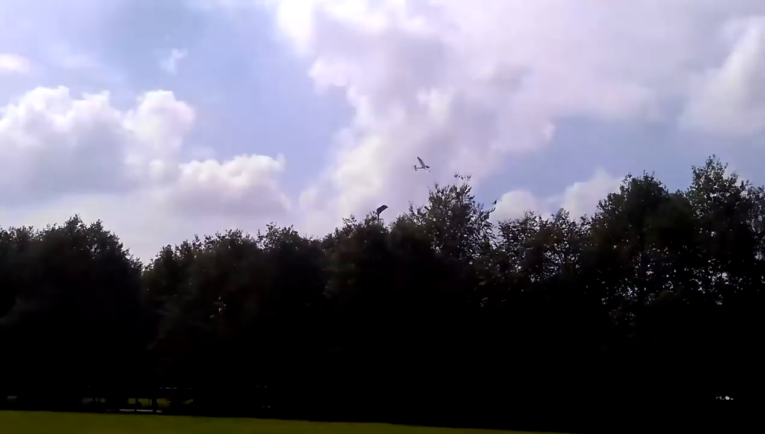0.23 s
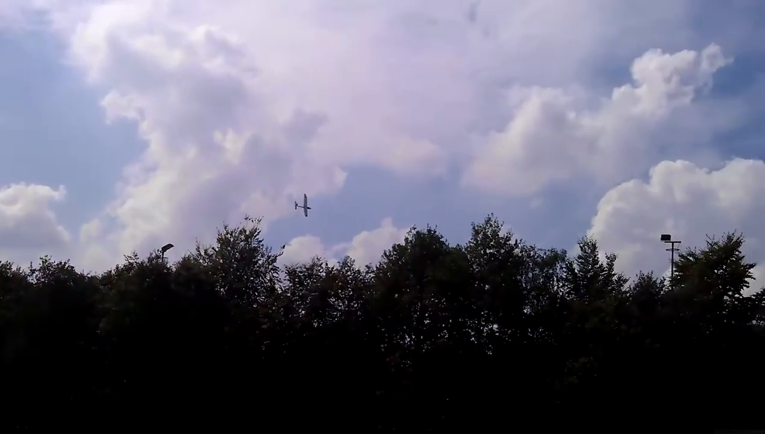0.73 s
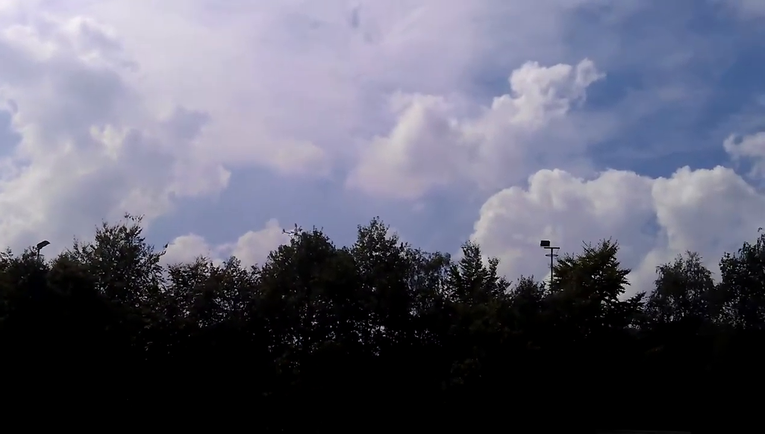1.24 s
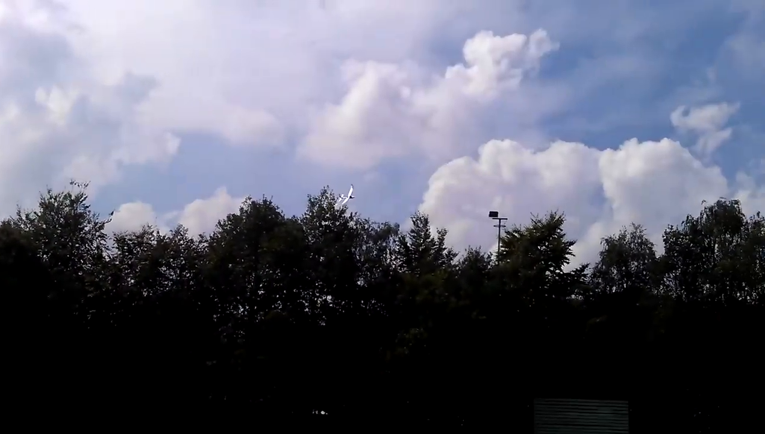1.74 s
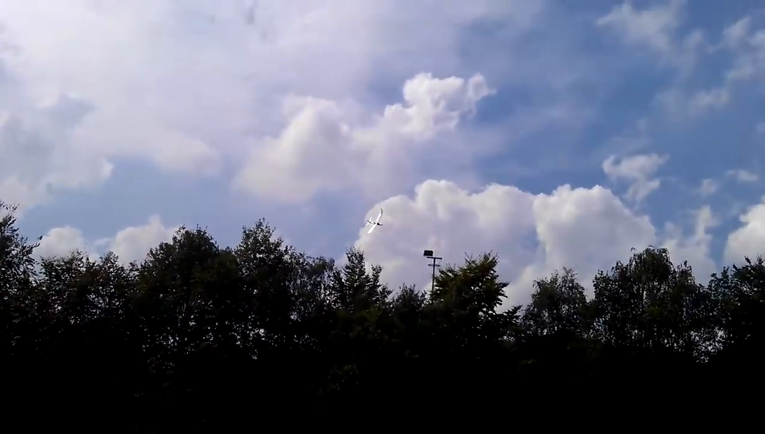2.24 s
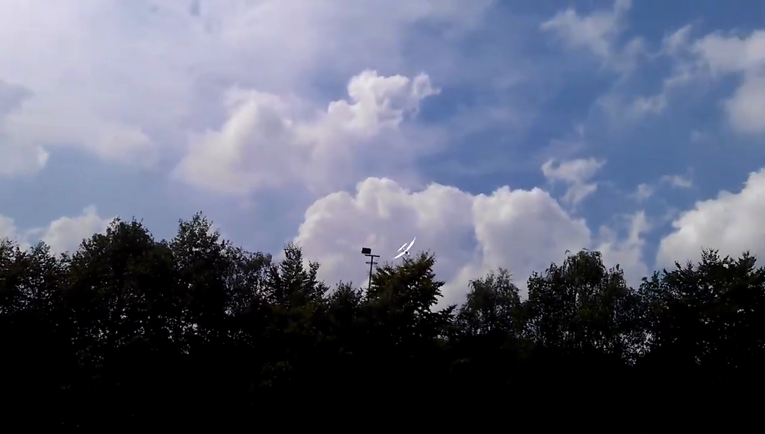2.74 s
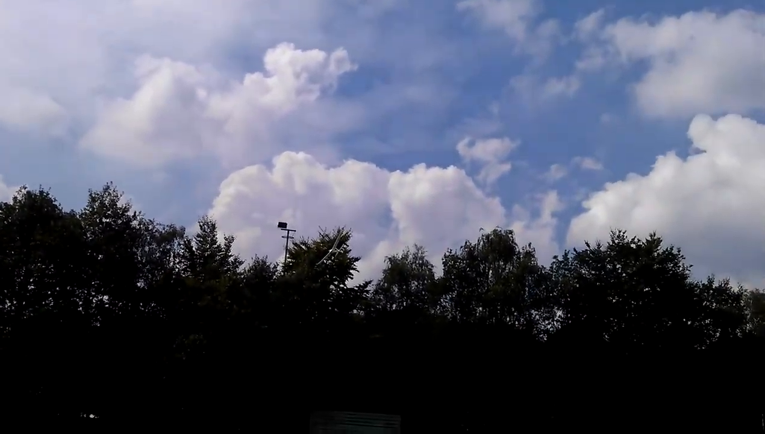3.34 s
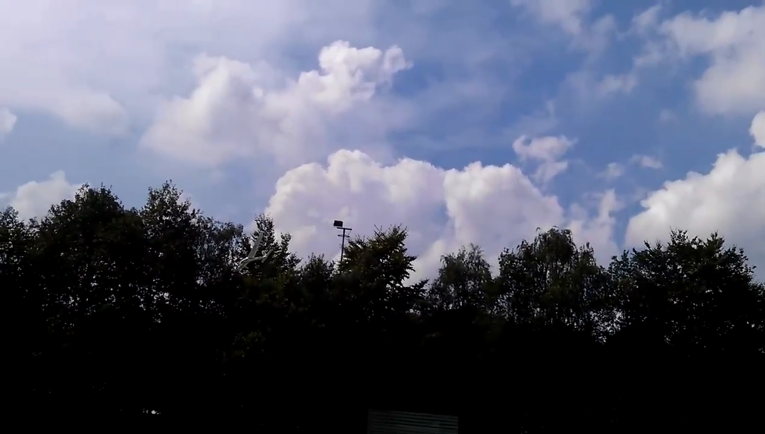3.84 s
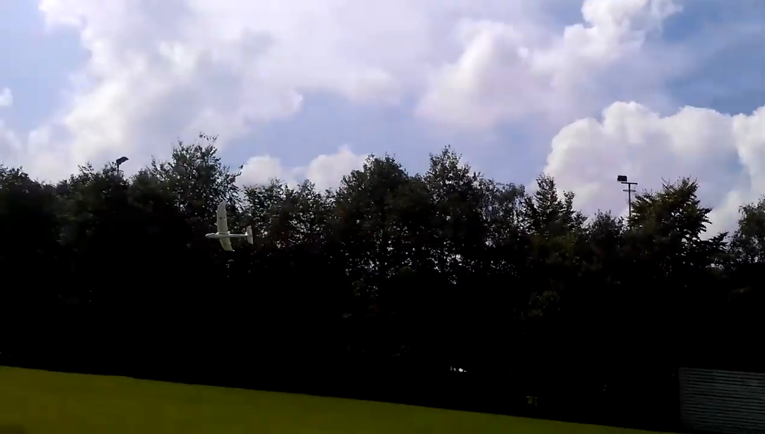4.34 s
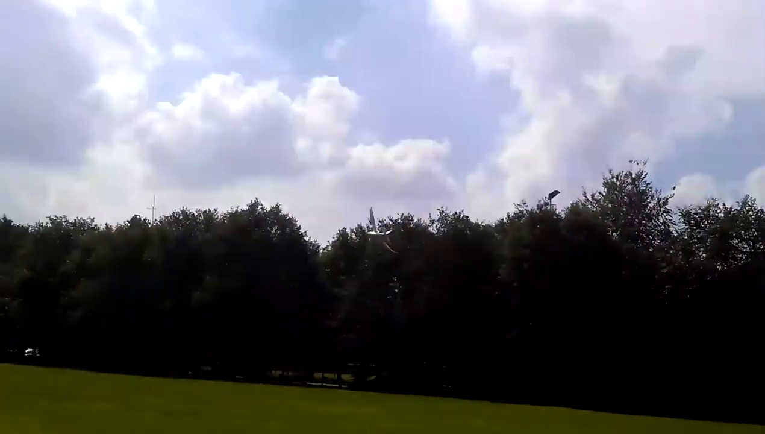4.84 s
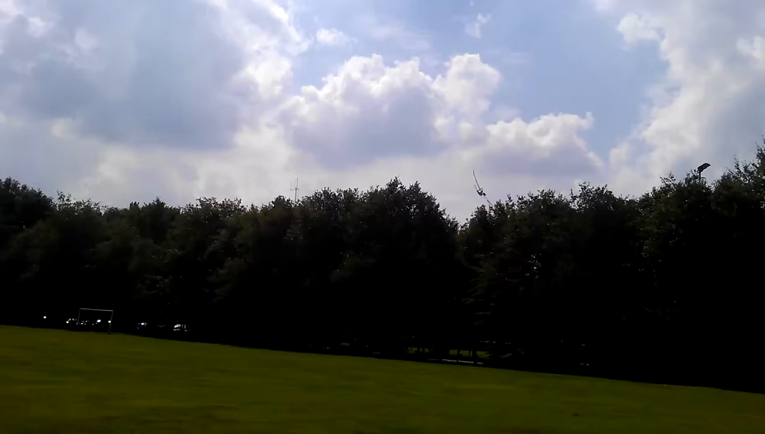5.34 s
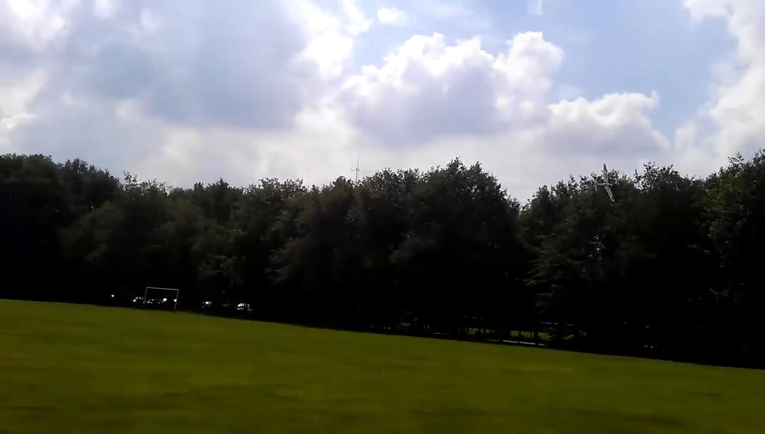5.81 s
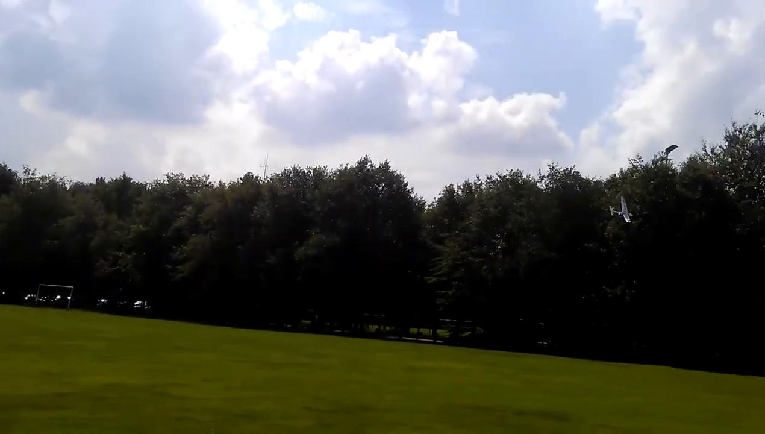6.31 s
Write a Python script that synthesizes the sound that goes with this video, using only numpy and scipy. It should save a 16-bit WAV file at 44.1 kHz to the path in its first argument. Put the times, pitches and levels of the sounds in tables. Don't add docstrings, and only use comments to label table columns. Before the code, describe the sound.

A small electric model plane whines shrilly past over an open field, swells close, then its motor cuts and winds down to quiet, with a sharp tick on the camera.

```python
import sys
import numpy as np
from scipy import signal
from scipy.fft import rfft, irfft
from scipy.io import wavfile
from scipy.ndimage import uniform_filter1d

SR = 44100
rng = np.random.default_rng(int(sys.argv[2]) if len(sys.argv) > 2 else 0)


def amplitude_ratio(level_db):
    exponent = np.asarray(level_db, float) / 20
    return 10 ** exponent


def put_to_file(sound):
    columns = np.atleast_2d(sound).T
    safe = np.clip(columns, -1, 1)
    whole_steps = np.round(safe * 32767)
    wavfile.write(sys.argv[1], SR, whole_steps.astype(np.int16))


N = 289869
TIME = np.arange(N) / SR
SIDES = np.array([[1], [-1]])

# [t/s, rate/(turns per s)]
POWERED = [(0.65, 223.2), (1.35, 223.3), (1.48, 227.0), (1.6, 228.1), (1.83, 231.8), (1.99, 233.0),
           (2.2, 231.8), (2.5, 233.2), (2.66, 236.3), (3.1, 238.5), (3.26, 237.4), (3.47, 240.7),
           (3.71, 239.2), (3.92, 240.7), (4.14, 239.0), (4.39, 232.2), (4.58, 227.5)]
# [t/s, rate/(turns per s)]
COASTING = [(4.58, 227.5), (4.7, 205.5), (4.78, 194), (4.86, 166), (4.95, 129), (5.08, 100), (5.42, 53.6),
            (5.63, 39.3), (5.91, 20.4)]
# [t/s, f/Hz]
CHOPPER_HZ = [(0.65, 7583), (1.33, 7643), (1.59, 7715), (1.87, 7821), (2.8, 7920), (3.25, 8002),
              (3.8, 7960), (4.1, 7890), (4.3, 7765), (4.7, 7494), (4.9, 7471)]
# [t/s, length/s, level/dB, left minus right/dB]
WHINE_GLINTS = [(0.668, 0.23, -39.5, -4), (1.009, 0.31, -44.5, -5), (1.277, 0.1, -42.5, -2),
                (1.414, 0.092, -32, -9.6), (1.546, 0.11, -29.0, -16.2), (1.744, 0.2, -33.5, -15),
                (1.89, 0.41, -40, -11), (2.304, 0.17, -33.5, -5.4), (2.442, 0.17, -33, -20),
                (2.666, 0.19, -35, -9.0), (2.894, 0.064, -35, -1), (3.051, 0.1, -53, -19.9),
                (3.329, 0.088, -51.5, -21.5), (3.49, 2.2, -52.5, -9), (3.886, 0.15, -29, -3.5),
                (4.032, 0.03, -33, -6.7), (4.131, 0.097, -28, -7), (4.279, 0.09, -24.5, -7),
                (4.46, 0.21, -28.5, -7.5), (4.613, 0.061, -31, -13.1)]
# [t/s, length/s, level/dB]
COAST_GLINTS = [(4.82, .12, -59), (4.92, .08, -59), (4.989, .034, -41.5), (5.04, .06, -53),
                (5.14, .08, -55), (5.22, .04, -61), (5.285, .04, -58), (5.41, .13, -55.5),
                (5.575, .08, -57), (5.76, .1, -60.5), (5.86, .07, -64)]
# [t/s, length/s, level/dB, left minus right/dB]
CHOPPER_GLINTS = [(.754, 0.15, -59, -22), (1.04, 2.1, -53, -4), (1.44, 0.082, -32.5, -12),
                  (1.58, 0.081, -34, -9), (1.74, 0.14, -38, -17), (2.03, 0.39, -50.5, -5),
                  (2.294, 0.16, -40.5, -9), (2.465, 0.18, -36.5, -17), (2.659, 0.081, -37, -20),
                  (2.868, 0.16, -36, -3), (3.072, 0.15, -42.5, -14), (3.283, 0.34, -42, -21.5),
                  (3.489, 0.14, -42.5, -20.5), (3.86, .534, -51, -8), (4.094, 0.18, -30, -20),
                  (4.272, .073, -30, -13), (4.43, 0.15, -32.5, -11.5), (4.55, 0.12, -39, -11.5),
                  (4.684, 0.14, -43, -13)]
# [t/s, length/s, level/dB]
BLADE_BEAMS = [(0.74, 0.93, -57), (1.682, 0.75, -45.5), (2.373, 0.41, -48.5), (2.84, 1, -54),
               (3.49, 0.14, -50.5), (3.889, 0.4, -44.8), (4.245, 0.47, -32.5), (4.651, 0.069, -41),
               (4.725, 0.17, -41.5)]
# [t/s, length/s, level/dB]
SECOND_BEAMS = [(0.841, 1.25, -56.5), (1.611, 0.42, -48.5), (3.04, 0.68, -57.5), (3.518, 0.396, -52.5),
                (3.934, 0.315, -41.5), (4.236, 0.37, -34), (4.618, 0.286, -47.5)]
# [t/s, length/s, level/dB]
HALF_BEAMS = [(.79, 1.2, -55), (1.351, .19, -57), (1.562, .09, -48), (1.812, .565, -45.5),
              (2.38, .4, -49.5), (2.76, .44, -49.5), (3.1, .34, -53), (3.46, .47, -46.5), (3.833, .35, -48),
              (4.073, .177, -39.5), (4.303, .045, -41), (4.4, .36, -41), (4.69, .1, -48)]
# [t/s, length/s, level/dB]
UPPER_BEAMS = [(.9, 0.67, -58), (2.3, 0.26, -58), (2.7, 0.28, -56), (3.5, .2, -62.5), (3.88, .2, -47),
               (4.1, .2, -47.5), (4.32, 0.07, -40), (4.48, 0.26, -35), (4.62, .08, -48)]
# [t/s, length/s, level/dB]
BEAT_BEAMS = [(.95, 0.86, -64), (1.45, 0.17, -55), (1.75, .2, -59.5), (2.4, 0.54, -61), (2.85, 0.48, -58.5),
              (3.4, .4, -47.5), (3.68, 0.29, -48), (3.9, 0.2, -43.5), (4.2, .15, -50), (4.32, 0.055, -46)]
# [multiple of shaft rate, t/s, length/s, level against the buzz/dB]
ORDERS_DB = [(1, 2.8, .3, 0), (3, 2.55, .7, 4), (3, 4.35, .5, 3), (6, 1.7, .5, 0), (6, 2.45, .3, -2),
             (6, 3.7, .8, 2), (6, 4.5, .3, 2), (7, 2.5, .4, 0), (7, 4.4, .4, 3), (8, 2.6, .6, 0),
             (8, 4.15, .3, 1), (10, 1.35, .4, 2), (10, 2.4, .7, 0), (10, 4.3, .7, 1.5), (11, 3.7, .5, -4),
             (12, 1.65, .5, -7), (12, 4.1, .5, -4), (9, 3.9, .15, 3), (72, 5.19, .06, -9),
             (72, 5.5, .12, -5), (108, 5.65, .13, 5)]

# [t/s, level per third octave/dB, treble minus bass/dB]
FLIGHT = [(.68, -63, -7.5), (1.25, -64.5, -10.5), (1.5, -58.5, -10), (1.85, -56, -5), (2.05, -64.5, -10.5),
          (2.32, -56.5, -5.5), (2.55, -58.5, -6.5), (2.8, -56, -5), (3.12, -60, -4), (3.35, -55, -0.5),
          (3.75, -57, 1), (3.9, -51, 0.5), (4.66, -50.5, -1), (4.93, -64.5, -6), (5.05, -63.5, -13.5),
          (5.17, -70.5, -13), (6.0, -74, -17), (6.55, -76.5, -16.5)]
# [offset/dB, share of the tilt]
AIR_BANDS = [
    (-9, -0.53),
    (0.03, -0.51),
    (0, -0.0038),
    (0.4, 0.66),
]
AIR_HZ = [200, 800, 2200, 5700]
# [f/Hz, level/dB]
AIR_COLOUR = [(48, -34), (62, -13.5), (100, -13.5), (190, 5.5), (330, -2.5), (800, 2.5), (1150, 2.5),
              (1400, 1), (3000, 0), (4200, 6.5), (6300, 0), (8300, 8), (9700, -1)]
# [f/Hz, left minus right/dB, likeness 0-1]
PORTS = [(60, 3, 0.96), (200, 0.5, 0.94), (700, 1, 0.9), (1400, 1.4, 0.33), (3070, -0.3, 0.76),
         (5460, -1.5, 0.4), (8850, -9, 0.55), (9880, 3.5, 0.2), (13100, 16.5, 0)]

# [t/s, f/Hz, peak level/dB, t60/s]
THUMP = (2.6147, 270, -24, .013)
# [t/s, peak level/dB, left minus right/dB]
TICKS = [
    (3.9943, -5.5, 5.5),
    (3.9959, -19, 3.5),
    (5.0859, -27.5, 7),
    (5.096, -45, 0),
]
# [f/Hz, level/dB, t60/s]
CASE = [(1300, -8, 0.0035), (2540, -3, 0.0056), (4300, 7.5, 0.003), (8180, 3.5, 0.006), (9870, 4, 0.0024),
        (13900, -14.5, .002)]
# [t/s, f/Hz, level/dB]
HOOT = [
    (2.69, 613, -73),
    (2.73, 654, -44),
    (2.78, 680, -49),
    (2.85, 640, -57),
    (2.9, 646, -80),
]
# [t/s, length/s, level/dB rms]
RUSTLES = [
    (5.0, 0.091, -77),
    (5.652, 0.085, -57.5),
    (5.74, 0.063, -59.5),
    (5.837, 0.073, -57),
    (6.195, 0.057, -66),
    (6.3, 0.065, -61.5),
]
# [f/Hz, level per Hz/dB]
RUSTLE_COLOUR = [(600, -8), (2000, -7), (4200, -2), (6500, -9.5), (8500, 2.5), (11000, -10.5), (13000, -34)]


def curves(table):
    s, *columns = np.transpose(table)
    return [np.interp(TIME, s, column) for column in columns]


def colour(hz, table, order=1):
    rows = np.array(table)
    return np.interp(np.log(hz), np.log(rows[:, 0]), rows[:, order])


def walk(rate):
    hold = int(SR / 32 / rate)
    steps = np.repeat(rng.standard_normal(N // 32 // hold + 2), hold)
    coarse = uniform_filter1d(uniform_filter1d(steps, hold), hold)
    return 1.3 * np.interp(np.arange(N) / 32, np.arange(len(coarse)), coarse)


def swells(rows):
    coarse_time = TIME[::32]
    s, length, db, *pan_db = np.transpose(rows)[:, :, None]
    bells = amplitude_ratio(db) * np.exp(-(2 * (coarse_time - s) / length) ** 2) + 1e-9
    total = bells.sum(axis=0)
    out = [20 * np.log10(total)]
    out += [(bells * pan).sum(axis=0) / total for pan in pan_db]
    return [np.interp(TIME, coarse_time, column) for column in out]


def tone(turns, db, pan_db, flutter_db, apart):
    drift = 0.32 * walk(30)
    lag = apart * walk(5)
    level = np.sqrt(2) * amplitude_ratio(db + flutter_db * walk(21.99))
    share = np.sqrt(2 / (1 + amplitude_ratio(-2 * SIDES * pan_db)))
    phase = 2 * np.pi * (turns + rng.random()) + drift + SIDES * lag / 2
    return level * share * np.sin(phase)


def motor(buzz_db):
    s, speed = np.transpose(POWERED + COASTING[1:])
    shaft_hz = uniform_filter1d(np.exp(np.interp(TIME, s, np.log(speed))), SR // 30)
    chop_hz = uniform_filter1d(curves(CHOPPER_HZ)[0], SR // 8)
    whine_db, pan_db = swells(WHINE_GLINTS + [(*row, 0) for row in COAST_GLINTS])
    chop_db, chop_pan_db = swells(CHOPPER_GLINTS)
    blade_db, second_db = swells(BLADE_BEAMS)[0], swells(SECOND_BEAMS)[0]
    half_db, upper_db = swells(HALF_BEAMS)[0], swells(UPPER_BEAMS)[0]
    beat_db = swells(BEAT_BEAMS)[0]
    turns = np.cumsum(shaft_hz * (1 + .0006 * walk(14))) / SR
    chops = np.cumsum(chop_hz) / SR
    power_off_s = 4.95
    powered = np.clip((power_off_s - TIME) / .05, 0, 1)

    out = tone(36 * turns, whine_db, pan_db, 1.2 + 2 * (1 - powered), 1.6 * shaft_hz / 240)
    out += powered * tone(38 * turns, upper_db, -7., 2., 1.2)
    out += powered * tone(18 * turns, half_db - 1, -1., 2.2, .5)
    out += powered * tone(2 * turns, blade_db, .3, .8, .05)
    out += powered * tone(4 * turns, second_db, .3, 1.2, .1)
    out += powered * tone(chops, chop_db, chop_pan_db, 1.2, 1.6)
    out += tone(chops - 18 * turns, beat_db, -1., 2.5, .5)
    out += amplitude_ratio(-9.5) * tone(chops - 20 * turns, beat_db, -1., 4.6, .5)
    for order in sorted({round(row[0]) for row in ORDERS_DB}):
        beams = 0
        for multiple, s, length, db in ORDERS_DB:
            if round(multiple) == order:
                beams = beams + amplitude_ratio(db) * np.exp(-(2 * (TIME - s) / length) ** 4)
        out += beams * tone(order * turns, buzz_db, 0., 2.27, 0.15)
    return out, turns


def air(levels_db, turns):
    hz, s, (mid, side) = signal.stft(rng.standard_normal((2, N)), SR, nperseg=2048)
    knocks = np.sin(89 * np.pi * turns) / (np.sin(np.pi * turns) + 1e-9) * (TIME < 4.7) / 14
    knock_frames = signal.stft(knocks, SR, nperseg=2048)[2]
    patches = uniform_filter1d(rng.standard_normal(mid.shape), 12, axis=0)
    patches = uniform_filter1d(patches, 14, axis=1)
    patch_gain = amplitude_ratio(-6.5 + 3.5 * patches / patches.std())
    mid = mid + patch_gain * (hz > 1300)[:, None] * knock_frames

    hz = hz + 1
    frames = np.minimum(s * SR, N - 1).astype(int)
    place = np.interp(np.log(hz), np.log(AIR_HZ), range(4))[:, None]
    db = sum(np.clip(1 - abs(place - k), 0, 1) * level[frames] for k, level in enumerate(levels_db))
    third = 3 * np.log2(hz / 30)[:, None]
    db += sum(np.clip(1 - abs(third - k), 0, 1) * 1.85 * walk(9)[frames] for k in range(28))
    db += (colour(hz, AIR_COLOUR) - 10 * np.log10(.23 * hz / (SR / 2)))[:, None]

    pan_db = colour(hz, PORTS)[:, None]
    like = np.clip(colour(hz, PORTS, order=2), 0, 1)[:, None]
    shared = np.sqrt((1 + like) / 2) * mid
    apart = np.sqrt((1 - like) / 2) * side
    ports = [amplitude_ratio(db + sign * pan_db / 2) * (shared + sign * apart) for sign in (1, -1)]
    noise = signal.istft(np.array(ports), SR, nperseg=2048)[1][:, :N]
    treble = signal.sosfilt(signal.butter(2, 1800, "high", fs=SR, output="sos"), noise)
    shaft_hz = np.gradient(turns) * SR
    chop = 0.26 * np.clip(shaft_hz / 230, 0, 1) ** 4 * np.cos(4 * np.pi * turns)
    return noise + chop * treble


def trees(x):
    delay_s, t60_s, level_db = .12, 0.51, -22
    t = np.arange(int(.7 * SR)) / SR - delay_s
    tail = rng.standard_normal((2, len(t))) * (t > 0) * amplitude_ratio(-60 * t / t60_s)
    tail *= amplitude_ratio(level_db) / np.sqrt(np.sum(tail[0] ** 2))
    return signal.fftconvolve(x, tail, axes=1)[:, :N]


def ring(s, hz, db, t60):
    t = np.clip(TIME - s, 0, .1)
    onset = 1 - np.exp(-t / 0.0002)
    return amplitude_ratio(db - 60 * t / t60) * np.sin(2 * np.pi * hz * t) * onset * (t < .1)


def handling():
    out = np.array([[1], [.25]]) * ring(*THUMP)
    for s, peak_db, pan_db in TICKS:
        softness_db = peak_db - TICKS[0][1]
        tick = 0
        for hz, db, t60 in CASE:
            dulling_db = 0.24 * softness_db * np.log2(hz / CASE[0][0])
            tick = tick + ring(s, hz, db + dulling_db + SIDES * colour(hz, PORTS) / 2, t60)
        out = out + amplitude_ratio(peak_db + SIDES * pan_db / 2) * tick / np.abs(tick).max()
    return out


def hoot():
    hz, db = curves(HOOT)
    return tone(np.cumsum(hz) / SR, db, 0., 1.4, .1) * (abs(TIME - 2.8) < .12)


def grass():
    swell = 0
    for s, length, db in RUSTLES:
        swell = swell + amplitude_ratio(db) * np.exp(-.5 * ((TIME - s) / (length / 2.53)) ** 2)
    sizes = amplitude_ratio(2.4 * rng.exponential(size=N))
    cracks = rng.standard_normal((2, N)) * sizes * amplitude_ratio(2.0 * walk(120))
    hz = np.arange(1, N // 2 + 2) * SR / N
    shape = amplitude_ratio(colour(hz, RUSTLE_COLOUR) + SIDES * colour(hz, PORTS) / 2)
    cracks = irfft(rfft(cracks + 4.4 * cracks[::-1]) * shape, N)
    return swell * cracks / np.sqrt(np.mean(cracks ** 2))


def treble_gaps(x):
    from_hz, to_hz, below_db, scatter_db = 9000, 12600, -33, 3.5
    hz, _, z = signal.stft(x, SR, nperseg=2048)
    power = (abs(z[:, :1024]) ** 2).sum(axis=0)
    strips = power.reshape(64, 16, -1).sum(axis=1) + 1e-18
    strip_hz = hz[:1024:16]
    whine = strips[(strip_hz > 7000) & (strip_hz < from_hz - 500)].max(axis=0)
    scatter = uniform_filter1d(rng.standard_normal(strips.shape), 3, axis=1) * np.sqrt(3)
    audible = 10 * np.log10(strips / whine) + scatter_db * scatter > below_db
    outside = (strip_hz < from_hz) | (strip_hz > to_hz)
    z[:, :1024] *= np.repeat(audible | outside[:, None], 16, axis=0)
    return signal.istft(z, SR, nperseg=2048)[1][:, :N]


def scene():
    level_db, tilt_db = curves(FLIGHT)
    levels_db = [level_db + offset_db + share * tilt_db for offset_db, share in AIR_BANDS]
    tones, turns = motor(levels_db[2])
    field = tones + trees(tones) + air(levels_db, turns) + grass() + hoot()
    field = signal.sosfilt(signal.ellip(6, .5, 45, 11550, fs=SR, output="sos"), field)
    case = signal.sosfilt(signal.butter(8, 15800, fs=SR, output="sos"), handling())
    return field + case


def roll_off(x):
    return signal.sosfilt(signal.butter(12, 16520, fs=SR, output="sos"), x)


def record(dry):
    start_s = .652
    heard = signal.sosfilt(signal.butter(4, 50, "high", fs=SR, output="sos"), treble_gaps(dry))
    mix = heard * np.clip((TIME - start_s) / .0005, 0, 1)
    return roll_off(mix)


dry = scene()
out = record(dry)
put_to_file(out)
```